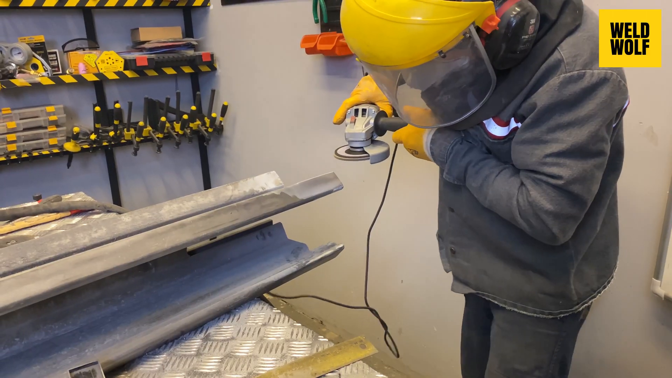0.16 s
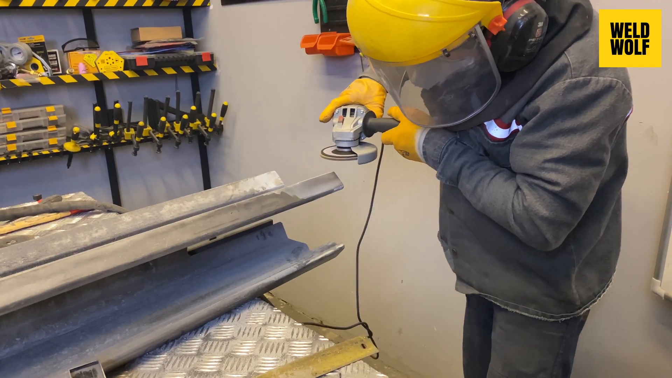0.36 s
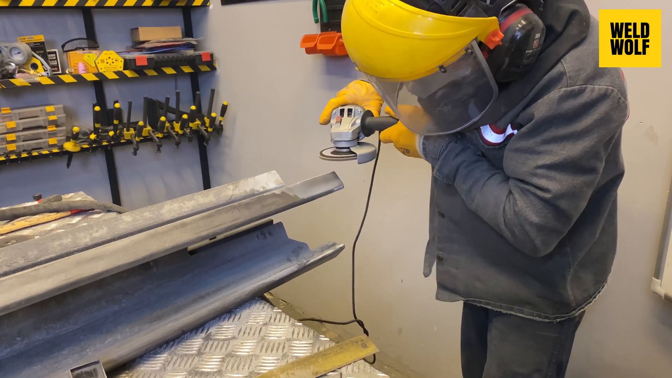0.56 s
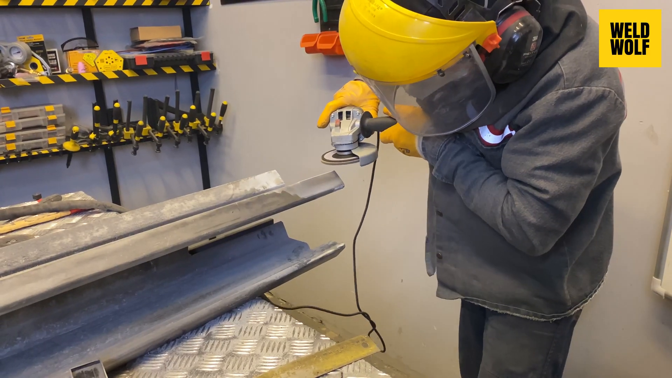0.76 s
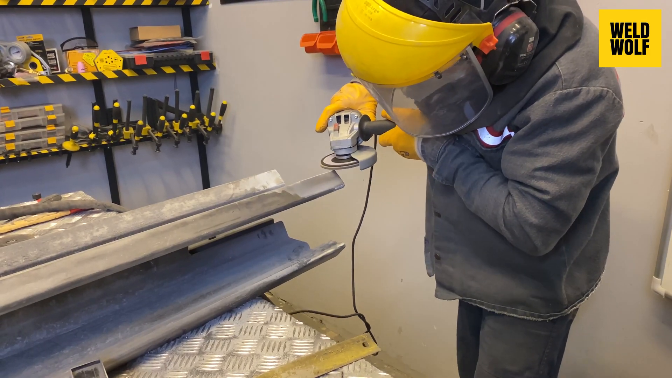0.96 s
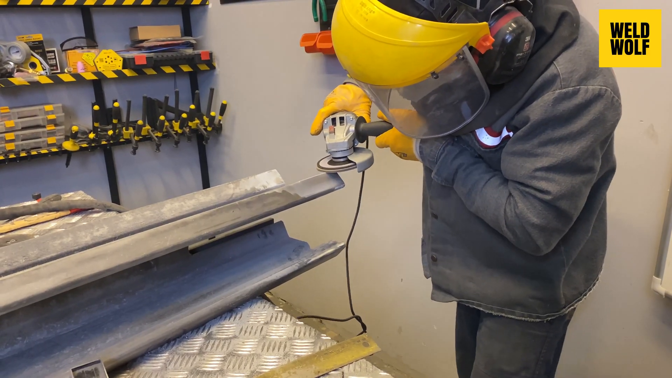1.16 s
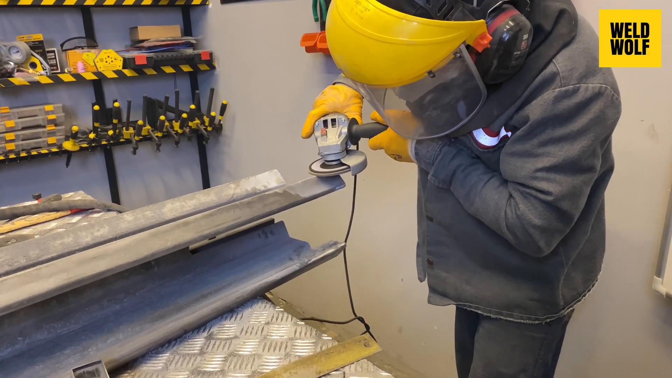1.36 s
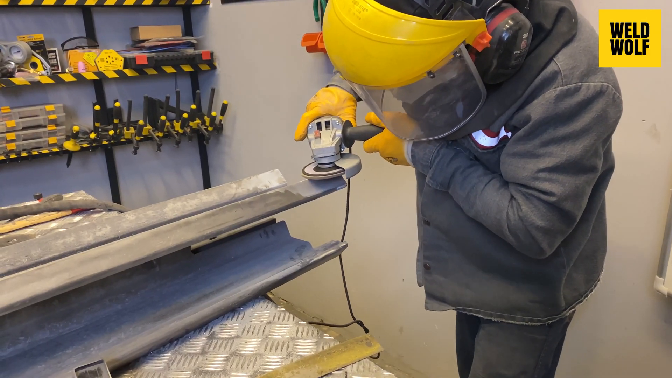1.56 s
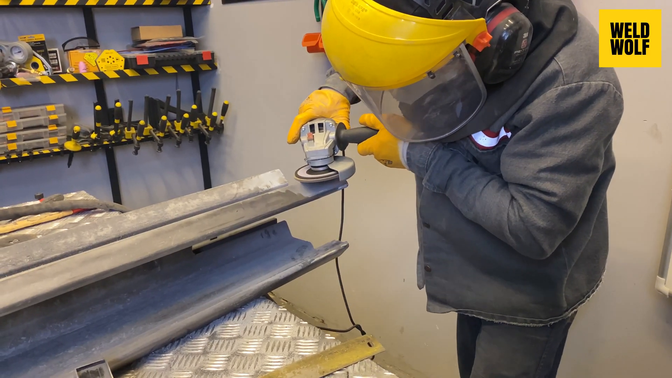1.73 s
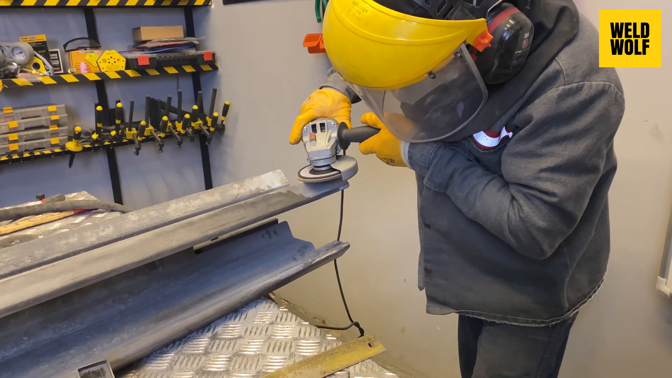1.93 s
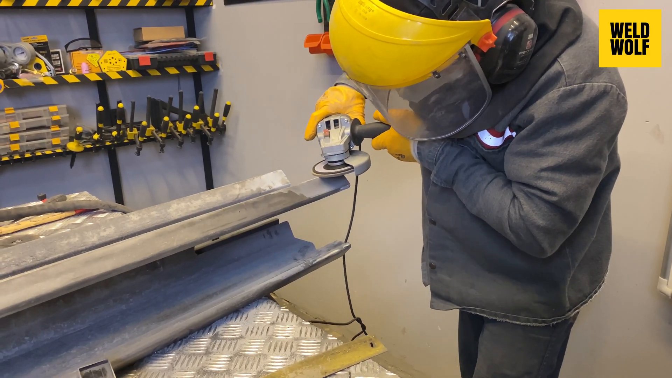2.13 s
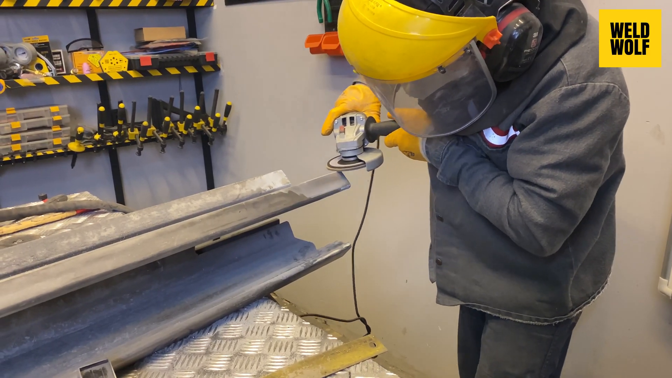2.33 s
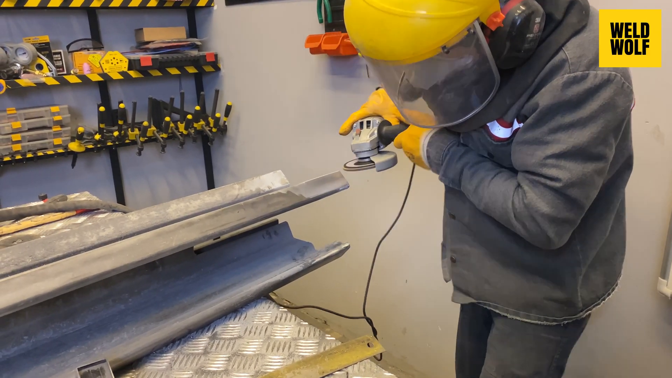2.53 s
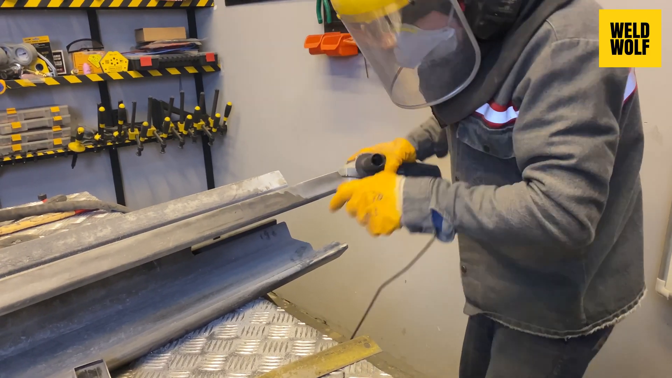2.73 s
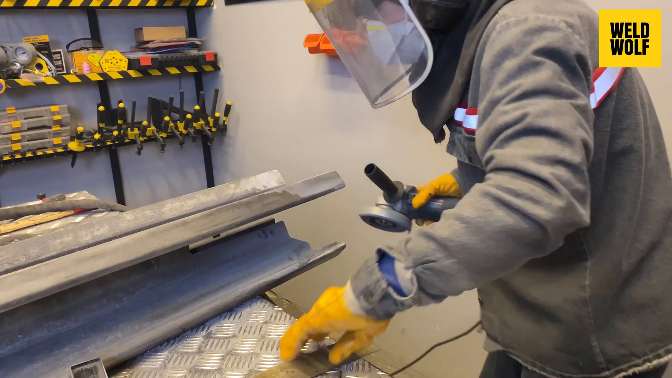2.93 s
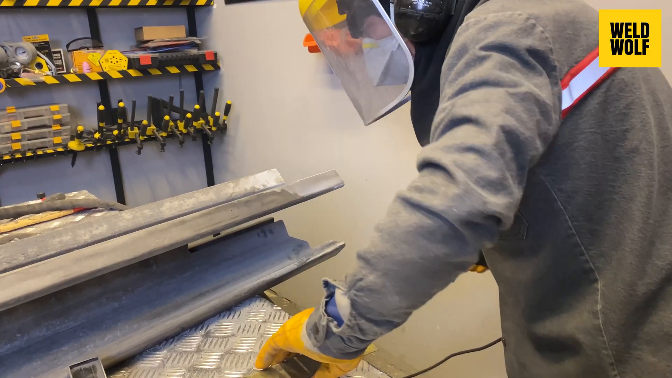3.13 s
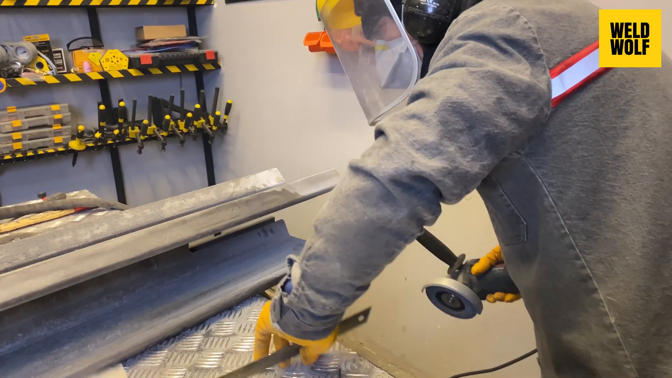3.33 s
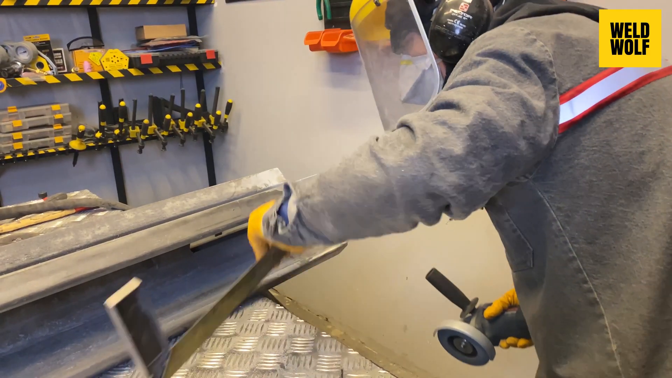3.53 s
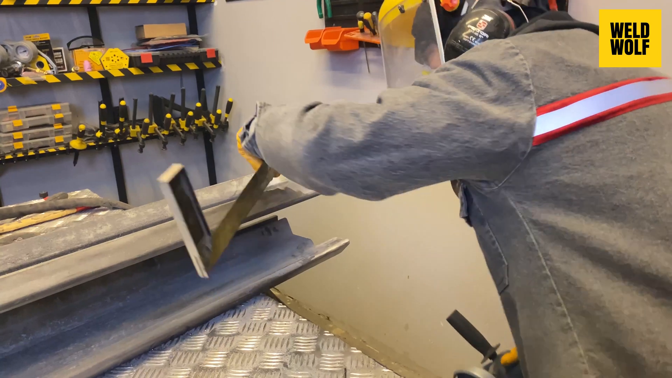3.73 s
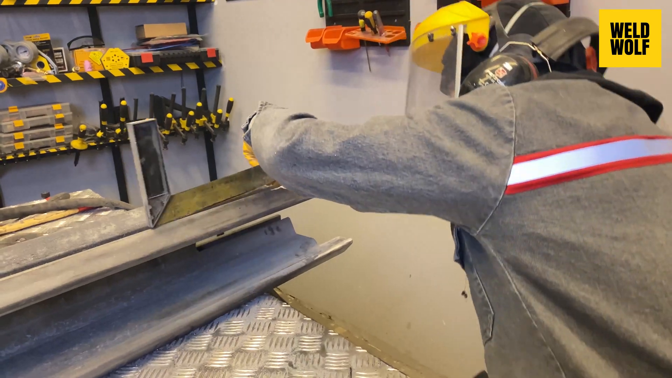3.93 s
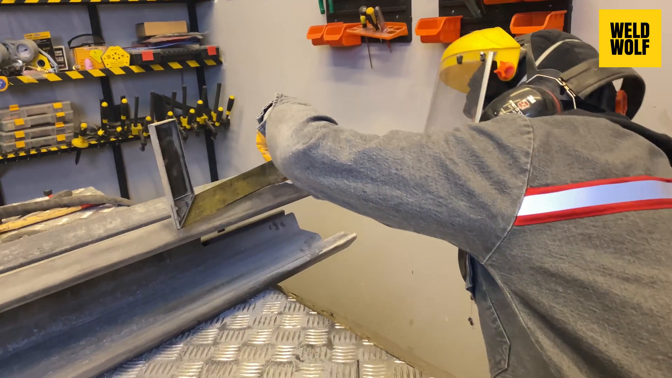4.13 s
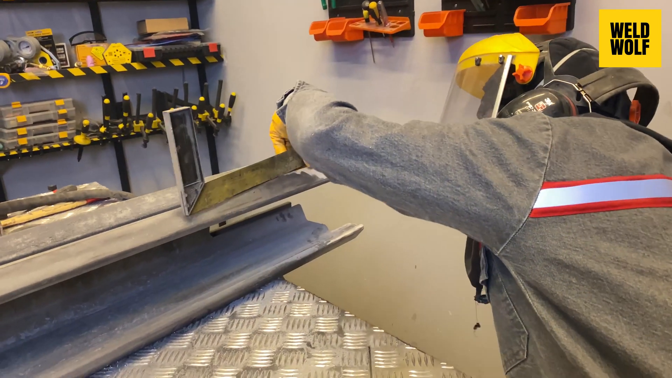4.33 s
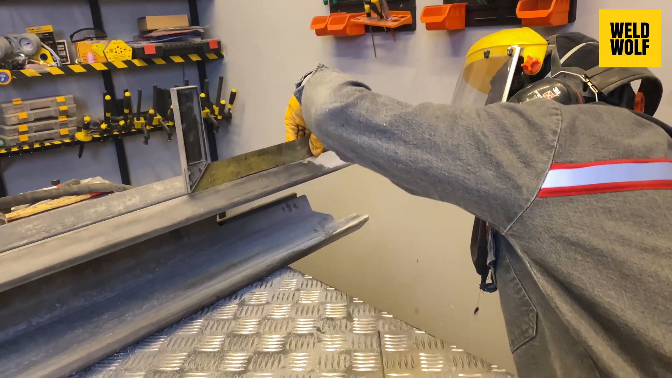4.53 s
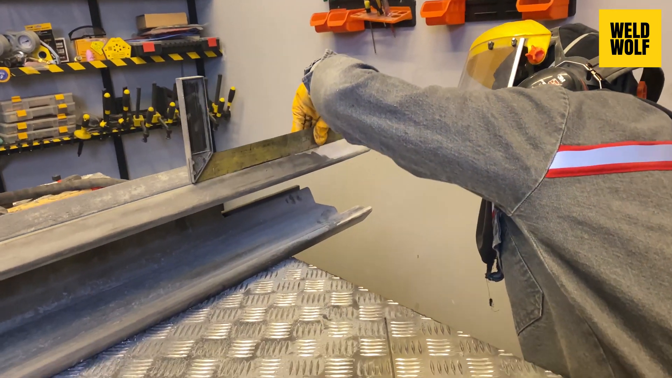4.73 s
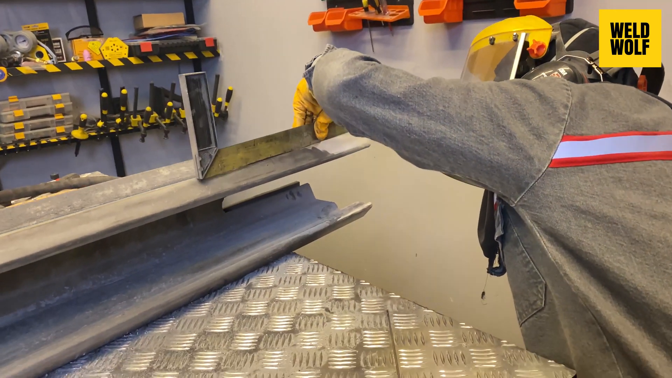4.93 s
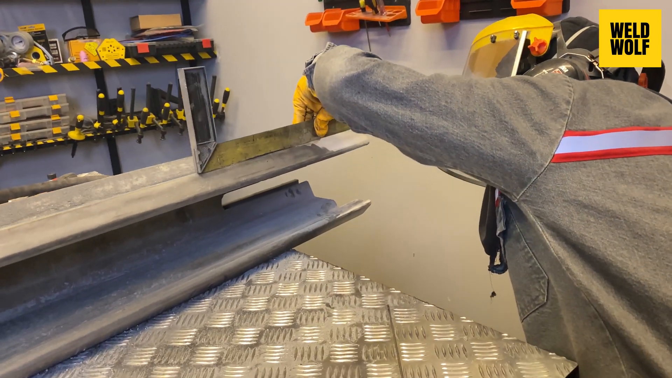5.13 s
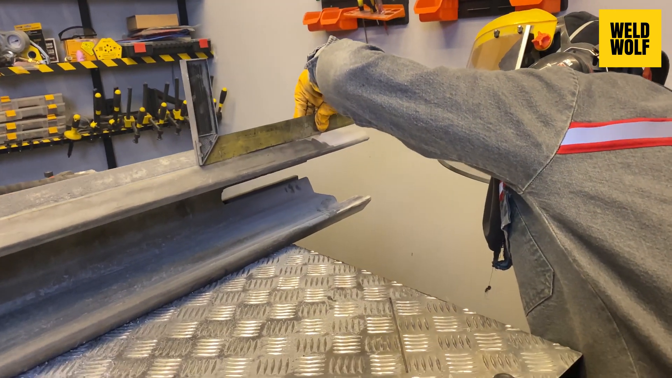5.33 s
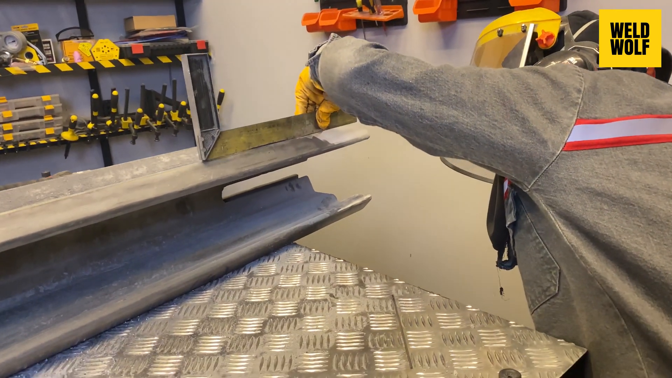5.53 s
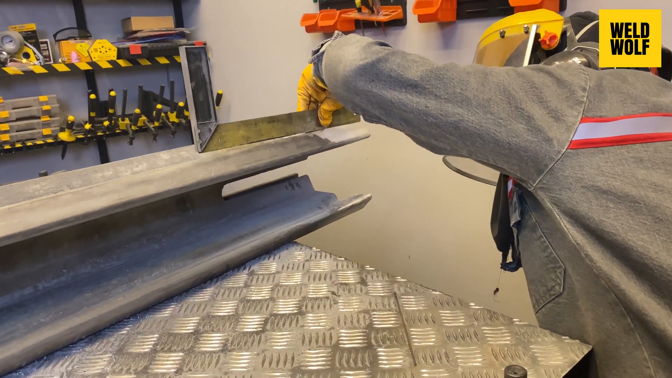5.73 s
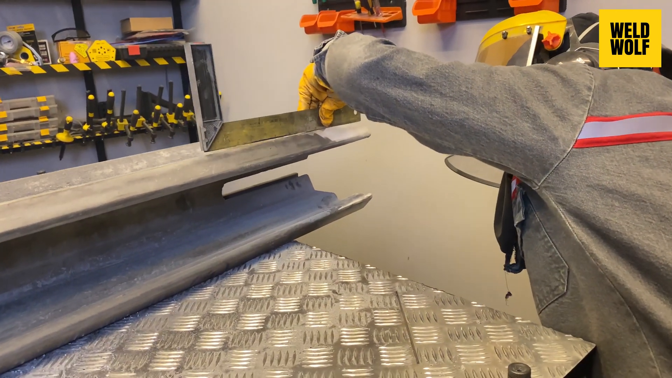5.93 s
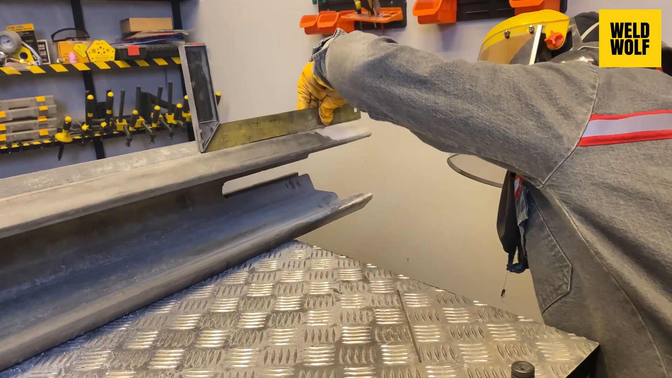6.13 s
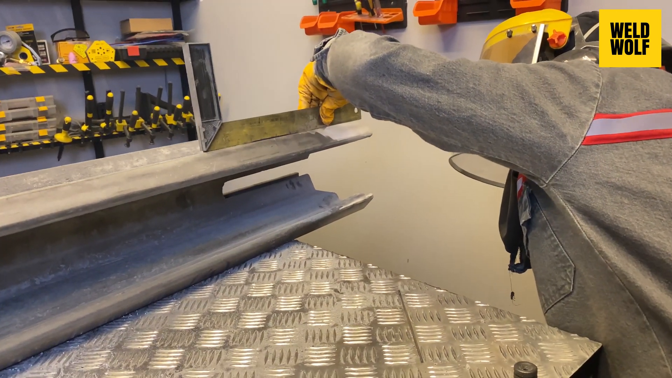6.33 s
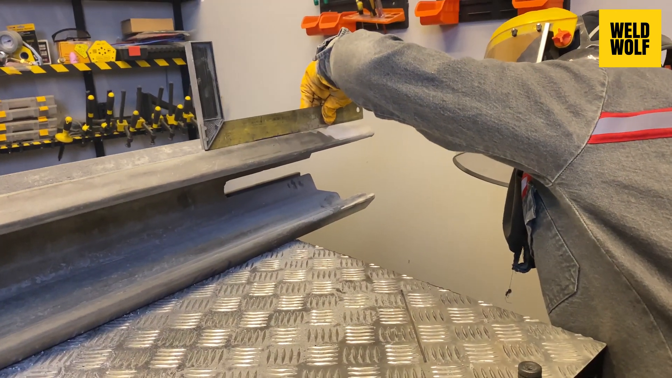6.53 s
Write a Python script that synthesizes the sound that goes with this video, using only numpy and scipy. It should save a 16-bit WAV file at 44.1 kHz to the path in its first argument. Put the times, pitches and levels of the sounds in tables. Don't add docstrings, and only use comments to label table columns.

```python
import sys
import numpy as np
from scipy import signal
from scipy.fft import rfft, irfft, next_fast_len
from scipy.io import wavfile
from scipy.ndimage import uniform_filter1d

SR = 44100
rng = np.random.default_rng(int(sys.argv[2]) if len(sys.argv) > 2 else 0)


def generate_wav(signal):
    frames = np.transpose(np.atleast_2d(signal))
    scaled = np.clip(frames, -1, 1) * 32767
    pcm = np.round(scaled).astype(np.int16)
    wavfile.write(sys.argv[1], SR, pcm)


def volts_from_db(level):
    exponent = np.asarray(level, float) / 20
    return 10 ** exponent


N = 294147
M = next_fast_len(N + SR, True)
T = np.arange(N) / SR
HZ = np.arange(M // 2 + 1) * SR / M + 1e-3

DISC_PER_ROTOR = 10 / 39
RATED_HZ = 500
START_HZ, RUN_UP_HZ_PER_S, FIRST_OFF_S = 553, 130, .09
SOFT_START_S, SOFT_RISE_S, SECOND_OFF_S = .93, .105, 2.39
DRAG_EQUAL_HZ, DRAG_PER_S = 391, .243
# (time [s], speed [Hz])
LOADED_SPEED = [
    (1.25, 507),
    (1.43, 506),
    (1.75, 508),
    (1.89, 512),
    (1.98, 504),
    (2.15, 500),
    (2.31, 505),
    (2.39, 526),
]
# (time [s], level [dB])
FACING = [(0, -0.5), (.3, -3), (.72, -0.5), (1.24, 1), (1.69, 1.5), (2.38, -1), (2.73, 0.5), (3, 0.5),
          (3.5, 2.5), (4.03, 1.5), (4.25, 0.5), (4.85, 0), (5.9, 2)]
# (frequency [Hz], density [dB per Hz])
CASE_COLOUR = [(150, -23), (300, -19), (700, -9), (1200, -13), (2300, -8), (3000, -12), (4000, -9.5),
               (6300, -22.5), (8600, -26), (11800, -31.5), (14500, -37.5), (15800, -59)]
# (frequency [Hz], width [Hz], lift [dB])
CASE_MODES = [(721, 64, 4), (1143, 200, 7.5), (1990, 63, 4.5), (2190, 320, 6.5), (2474, 97, 8),
              (3560, 74, 7.5), (3730, 83, 8), (4390, 72, 10.5), (6170, 1000, 14)]
CASE_DB, CASE_IDLE_HZ = -49, 49
TREBLE_HZ, TREBLE_DB_PER_DECADE = 5050, 2.5
STALL_S, STALL_DB_PER_S, STALL_DEPTH_DB = 6.156, 70, 40
# (frequency [Hz], density [dB per Hz])
FAN_COLOUR = [(150, -28), (320, -27.5), (500, -15), (900, -16), (2080, -1.5), (2700, -7.5), (3200, -2.5),
              (5500, -3.5), (7400, -6), (9000, -14), (11000, -15), (13300, -15), (15800, -17)]
FAN_DB, FAN_DB_PER_DECADE = -44, 34
SHADOW_S, SHADOW_DB = 2.64, -10.5

# (time [s], pressure [dB], lean onto the flaps [dB], beam contact [dB])
GRIND = [(.985, -60, 4, 5), (1.0, -53, 3, 3), (1.008, -45, 1, -0.5), (1.06, -46, 0.5, -1.5),
         (1.128, -40, -2.5, -4), (1.31, -37.5, -5, -5.5), (1.68, -42, -1.5, -2.5), (1.74, -39, -7.5, -6.5),
         (1.9, -39.5, -5.5, -3.5), (2.25, -41.5, -1, -2), (2.33, -45.5, -2.5, 2.5),
         (2.39, -61.5, 0.5, -1.5)]
# (frequency [Hz], density [dB per Hz])
GRIT_COLOUR = [(5000, -34), (8000, -10.5), (9300, -3.5), (10200, -1), (11300, -1), (12800, -5.5),
               (13300, -12), (14300, -3.5), (15100, -5.5), (15800, -1.5)]
# (frequency [Hz], density [dB per Hz])
FLAP_COLOUR = [(4500, -27), (5600, -8.5), (6800, 0.5), (7700, -2), (8400, -15), (9200, -14)]
# (frequency [Hz], density [dB per Hz])
BEAM_COLOUR = [(59, -48), (100, -28), (124, -15), (177, -15.5), (433, -8.5), (504, -4), (557, -13.5),
               (640, -4), (821, -11.5), (1560, -4), (2670, -16), (3490, 4.5), (5600, 6.5), (7280, -11),
               (12300, -120)]
# (times a disc turn [1], start [s], length [s], level [dB])
THUMPS = [
    (1, 1.25, .15, -67),
    (1, 2.05, .1, -70),
    (2, 1.5, .4, -73),
    (3, 1.3, .2, -72),
    (3, 2.05, .25, -69),
    (5, 1.25, .2, -67),
    (5, 2.08, .1, -65),
]
WEB_HZ = 1156
# (time [s], length [s], level [dB])
WEB = [
    (1.3, 0.23, -58.5),
    (1.8, 0.41, -56),
]

HUM_DB, HUM_DB_PER_DECADE2 = -76, 300
# (time [s], length [s], level [dB])
HUM_SWELLS = [(.05, 0.034, -66), (.22, 0.15, -59.5), (.47, .05, -60.5), (.65, 0.055, -61),
              (.88, 0.032, -56), (.98, 0.068, -62), (1.13, 0.044, -58.5), (1.24, 0.15, -59.5),
              (1.5, 0.078, -64), (1.68, 0.3, -61), (2.1, 0.18, -62), (2.36, .19, -61), (2.62, 0.033, -54.5),
              (2.74, 0.23, -66), (3.05, 0.18, -70.5)]
MESH_DB, MESH_BEST_HZ, MESH_DB_PER_OCTAVE2 = -75.5, 1300, 7
# (time [s], length [s], level [dB])
BITES = [
    (1.14, .01, -45),
    (1.21, .05, -39),
    (1.335, .025, -42),
    (1.42, .05, -38.5),
    (1.77, .15, -41),
    (2.0, .02, -46),
    (2.1, .07, -39),
    (2.25, .02, -52),
]
BLADES_DB, BLADES_DB_PER_DECADE, BLADES_LOAD_DB, BLADES_RUN_UP_DB = -56, 60, 1, 3
# (frequency [Hz], width [Hz], lift [dB])
VENT_LIFT = [(10900, 800, 4), (11900, 400, -4), (8600, 500, -5), (7200, 250, 11), (6400, 280, 15),
             (5750, 350, 11), (5000, 500, 13), (12900, 400, 4)]

SQUEAL_HZ, SQUEAL_RISE_HZ_PER_S, SQUEAL_HIGH_HZ = 4360, 30, 4490
# (time [s], length [s], level [dB])
SQUEAL = [
    (.605, 0.015, -45.5),
    (.685, 0.03, -41),
    (.74, .02, -46),
    (.8, 0.03, -45),
    (.85, 0.012, -39),
    (.915, .01, -43),
    (.95, 0.045, -40.5),
    (1.06, 0.015, -47),
]
# (time [s], length [s], level [dB])
SQUEAL_HIGH = [
    (.91, .025, -43),
    (.97, .06, -45),
]
SLACK_S, SLACK_DB, SLACK_FIRST_DB, SLACK_SETTLE_S = 3.49, -14, 9.5, 1
# (time [s], frequency [Hz])
SLACK_PITCH = [
    (3.45, 2406),
    (4.4, 2250),
    (4.8, 2383),
    (6.3, 2306),
]
# (time [s], frequency [Hz])
COVER_PITCH = [(3.5, 3620), (4.2, 3560), (4.7, 3490), (5.1, 3600), (5.5, 3480), (6.3, 3560)]
COVER_DB = -18
COVER_QUIET_S, COVER_QUIET_DB = 5.27, -10.5
# (frequency [Hz], start [s], level against the rattle [dB])
HOUSING = [(2224, 3.4, -14.5), (2430, 4.75, -15), (3970, 5, -16), (4280, 3.7, -18.5)]
# (frequency [Hz], time
# [s], length [s], level [dB])
SHIELD = [(1121, 0.071, .62, -61), (1120, 2.75, .25, -64), (2065, 2.27, 0.21, -52), (3200, 2.33, 0.12, -54),
          (1542, 1.93, 0.4, -54.5), (5170, 1.385, .05, -44), (4100, .75, 0.068, -48.5)]
HANDLE_HZ, HANDLE_S, HANDLE_DB = 710, 4.2, -15
GUARD_HZ = 5580
# (time [s], length [s], level [dB])
GUARD = [
    (1.45, .05, -46),
    (1.55, .09, -43),
    (1.97, .05, -47),
]
SQUEAK_HZ = 6570
# (time [s], length [s], level [dB])
SQUEAK = [
    (6.31, .02, -86),
    (6.37, 0.014, -85),
    (6.41, 0.019, -83),
    (6.49, .015, -93),
    (6.54, .03, -99),
]
# (time [s], frequency [Hz], level [dB], t60 [s])
RINGS = [(0, 5570, -39, .5), (0, 4360, -43, .35), (.843, 6030, -46, .12), (3.347, 4970, -43, .06),
         (3.347, 4270, -48, .05), (3.836, 6900, -41, .02), (3.836, 2720, -39, .035),
         (3.8535, 5490, -41, .045), (4.869, 1880, -49, .06), (4.869, 2720, -46, .025),
         (4.788, 1880, -43, .05), (4.87, 3820, -53, .09), (6.028, 1390, -68, .35), (6.028, 1640, -71, .25),
         (6.05, 1190, -72, .4)]

# (time [s], boom [dB], thud [dB], clink [dB], tick [dB])
KNOCKS = [(3.065, -65, -53, -58, -60), (3.169, -65, -49.5, -45, -62.5), (3.264, -54.5, -49.5, -46.5, -48.5),
          (3.347, -40, -36, -39, -43.5), (3.364, -54, -51, -42, -53.5), (3.385, -42, -52, -57, -58),
          (3.404, -47, -43.5, -54, -58.5), (3.836, -84, -81, -40, -39), (3.854, -80, -81, -49, -49.5),
          (3.919, -65.5, -52.5, -64, -64), (4.057, -78, -73, -50, -55.5), (4.1743, -77.5, -65, -41.5, -47),
          (4.191, -76, -55.5, -51, -54.5), (4.787, -67, -53, -50.5, -62.5), (4.81, -68, -58, -50, -65.5),
          (4.829, -75.5, -73, -55, -68.5), (4.869, -71.5, -65, -50, -60), (4.886, -68, -62, -52, -66.5),
          (5.531, -84, -78, -58, -63.5), (5.573, -65.5, -59.5, -76, -68), (5.696, -61, -57, -82, -70.5),
          (6.028, -78, -57, -61, -68.5), (6.044, -69, -55.5, -61, -73)]
# (frequency [Hz], level [dB], t60 [s])
PLATE_MODES = [(131, -8, 0.11), (190, -5, .09), (245, -4, .07), (293, 1, 0.24), (338, -1, 0.15)]
# (frequency [Hz], level [dB], t60 [s])
FLANGE_MODES = [(460, -1.5, 0.14), (546, 1, 0.1), (592, -1.5, 0.16), (644, 6, 0.057), (736, -1, 0.091),
                (995, 5.5, 0.027)]
# (frequency [Hz], level [dB], t60 [s])
SQUARE_MODES = [(1138, -5.5, 0.04), (1468, -8, 0.035), (1887, 0, 0.025), (2040, -3, 0.021),
                (2315, -6, 0.05), (2720, 6, 0.022), (3090, -7, 0.03)]
# (frequency [Hz], level [dB], t60 [s])
EDGE_MODES = [(3880, -3.5, 0.095), (5100, 2, 0.013), (5400, -15.5, 0.054), (7020, 3, 0.017),
              (11270, -10.5, 0.016)]

SHOP_DB, HUSH_S, HUSH_DB = -74, 6.52, -6
# (frequency [Hz], density [dB per Hz])
RUMBLE_COLOUR = [(12, -55), (20, -25), (63, -2), (103, -2), (139, 0), (197, -10), (232, -5.5), (359, -10.5),
                 (806, -11.5), (1440, -21.5), (5000, -42.5), (6500, -71.5), (11000, -120)]
# (time [s], length [s], level [dB])
STEPS = [(.1, 0.41, -72), (1.3, 0.24, -65.5), (1.72, 0.034, -64), (1.85, 0.22, -68), (2.3, 0.054, -65.5),
         (3.06, .02, -62), (3.17, 0.055, -54.5), (3.38, 0.087, -58), (5.62, .2, -73), (5.98, 0.068, -72),
         (6.43, 0.034, -77.5)]
DRONE_HZ, DRONE_DB = 63.3, -80
# (frequency [Hz], room against direct [dB])
ROOM = [(60, -8), (300, 8), (1000, 5.5), (3000, 0.5), (6000, -3.5), (8300, 11), (10000, -18.5),
        (15000, -15.5)]
ROOM_T60_S = .27
# (frequency [Hz], lag of the left port [cycles])
PORT_TURNS = [(0, 0), (1000, -.1), (4100, -.1), (5400, -.3), (7250, 0), (9250, .5), (9900, .8),
              (16000, 2.07)]
HIDDEN_S, HIDDEN_WET_DB, HIDDEN_LEFT_DB = 3.1, 5, -0.5
TOP_HZ = 15830


def motor(rotor, hz):
    lumps = volts_from_db(1.1 * walk(70) + 1.4 * np.cos(2 * np.pi * rotor * DISC_PER_ROTOR))
    chatter = rng.standard_normal(N) * volts_from_db(1.65 * rng.exponential(size=N)) * lumps
    case = colour(chatter, shape(CASE_COLOUR), lo_hz=1703, hi_hz=2830) * volts_from_db(-5.5)
    spec = rfft(case, M)
    for f, width, lift_db in CASE_MODES:
        resonance = (volts_from_db(lift_db) - 1) / (1 + (2 * (HZ - f) / width) ** 2)
        case = case + irfft(spec * resonance, M)[:N] * volts_from_db(1.0 * walk(6.3) - 1.2)
    dull = signal.sosfilt(signal.butter(2, TREBLE_HZ, fs=SR, output="sos"), case)
    decades = np.log10(hz / RATED_HZ)
    case = dull + (case - dull) * volts_from_db(TREBLE_DB_PER_DECADE * decades)
    gusts = rng.standard_normal(N) * volts_from_db(0.32 * walk(12))
    air = colour(gusts, shape(FAN_COLOUR), lo_hz=4586, hi_hz=6285)
    fan_db = FAN_DB + FAN_DB_PER_DECADE * decades + over_time(FACING) + SHADOW_DB * step(SHADOW_S, 0.12)
    return case * volts_from_db(rattle_db(hz) - 2.5) + air * volts_from_db(fan_db + 2.0)


def rattle_db(hz):
    speed_db = 20 * np.log10((hz + CASE_IDLE_HZ) / (RATED_HZ + CASE_IDLE_HZ))
    stall_db = np.clip(STALL_DB_PER_S * (T - STALL_S), 0, STALL_DEPTH_DB)
    return CASE_DB + speed_db - stall_db + over_time(FACING)


def speed():
    let_go_hz = START_HZ + RUN_UP_HZ_PER_S * FIRST_OFF_S
    first = np.minimum(START_HZ + RUN_UP_HZ_PER_S * T, coast(let_go_hz, FIRST_OFF_S))
    powered = first + (over_time(LOADED_SPEED) - first) * step(SOFT_START_S, SOFT_RISE_S)
    run_down = coast(LOADED_SPEED[-1][1], SECOND_OFF_S)
    return uniform_filter1d(np.where(T < SECOND_OFF_S, powered, run_down), SR // 20)


def coast(hz, off_s):
    angle = np.arctan(hz / DRAG_EQUAL_HZ) - DRAG_PER_S * np.maximum(T - off_s, 0)
    return DRAG_EQUAL_HZ * np.tan(np.maximum(angle, .01))


def grind(disc):
    turns = np.clip(disc - disc[int(.9 * SR)], 0, 890)
    touching = (T > GRIND[0][0]) & (T < GRIND[-1][0])
    press_db = np.where(touching, over_time(GRIND), -150)
    beat = volts_from_db(1.4 * np.cos(2 * np.pi * disc) + 2.1 * np.cos(6 * np.pi * disc) + 0.44 * walk(28))
    grit = colour(each_turn(turns, .8, 1.3) * beat, shape(GRIT_COLOUR), lo_hz=9700, hi_hz=12400)
    flaps = colour(each_turn(turns, 0.6, 2.4) * beat, shape(FLAP_COLOUR), lo_hz=5390, hi_hz=8350)
    beam = colour(each_turn(turns, 0.6, 1.9), shape(BEAM_COLOUR), lo_hz=2510, hi_hz=5060)
    flaps = flaps * volts_from_db(over_time(GRIND, column=2) + 3.5)
    beam = beam * volts_from_db(over_time(GRIND, column=3) - 1.0)
    return volts_from_db(press_db + 2.0) * (grit + flaps + beam)


def each_turn(turns, memory, scatter_db, size=320):
    fresh = rng.standard_normal((900, size)) * volts_from_db(scatter_db * rng.exponential(size=(900, size)))
    wheel = signal.lfilter([1], [1, -np.clip(memory, 0, .97)], fresh, axis=0).ravel()
    fine = signal.resample_poly(wheel, 4, 1)
    return np.interp(turns * size * 4, np.arange(len(fine)), fine)


def unbalance_hum(rotor, hz):
    resonance = volts_from_db(HUM_DB - HUM_DB_PER_DECADE2 * np.log10(hz / RATED_HZ) ** 2)
    gain = resonance + swells(HUM_SWELLS, rise_db_s=222, fall_db_s=220)
    return order_tone(rotor, 1, gain, wobble=.25, runout=0, waver_db=1.2)


def gear_mesh(rotor, hz):
    unloaded = volts_from_db(MESH_DB - MESH_DB_PER_OCTAVE2 * np.log2(10 * hz / MESH_BEST_HZ) ** 2)
    gain = unloaded + volts_from_db(-.3) * swells(BITES, rise_db_s=550, fall_db_s=550)
    return order_tone(rotor, 10, gain, wobble=.45, runout=.4, waver_db=1.3)


def fan_blades(rotor, hz):
    vents_db = sum(db * np.exp(-((23 * hz - f) / width) ** 2) for f, width, db in VENT_LIFT)
    touching = step(GRIND[0][0] + .05, .02) - step(GRIND[-1][0], .02)
    level_db = BLADES_DB + BLADES_DB_PER_DECADE * np.log10(hz / RATED_HZ) + vents_db
    level_db = level_db + BLADES_LOAD_DB * touching + BLADES_RUN_UP_DB * (1 - step(FIRST_OFF_S, .02))
    level_db = level_db - 3 * step(SECOND_OFF_S + .15, .05)
    blades = order_tone(rotor, 23, volts_from_db(level_db), wobble=1.2, runout=0, waver_db=1.8)
    octave_gain = np.exp(-((hz * 46 - 15300) / 700) ** 2) * volts_from_db(-59)
    return blades + octave_gain * np.sin(2 * np.pi * 46 * rotor)


def order_tone(rotor, order, gain, wobble, runout, waver_db):
    phase = 2 * np.pi * order * rotor + wobble * walk(40)
    phase = phase + runout * np.sin(2 * np.pi * rotor * DISC_PER_ROTOR)
    return np.sqrt(2) * np.sin(phase) * gain * volts_from_db(waver_db * walk(27))


def disc_thumps(disc):
    out = np.zeros(N)
    for per_turn, *swell in THUMPS:
        gain = swells([swell], rise_db_s=67.5, fall_db_s=63.0)
        out += gain * np.sqrt(2) * np.sin(2 * np.pi * round(per_turn) * disc)
    return out


def loose_flange(disc):
    pitch = SQUEAL_HZ + SQUEAL_RISE_HZ_PER_S * (T - SOFT_START_S)
    low_gain = swells(SQUEAL, rise_db_s=300, fall_db_s=200) * volts_from_db(.6)
    high_gain = swells(SQUEAL_HIGH, rise_db_s=300, fall_db_s=300)
    low = singing(pitch, low_gain, disc, flutter=165, beat_db=3.0)
    return low + singing(SQUEAL_HIGH_HZ, high_gain, disc, flutter=120, beat_db=3.0)


def slack_gears(hz, disc):
    first_db = SLACK_FIRST_DB * (1 - step(SLACK_S + SLACK_SETTLE_S, .1))
    gain = volts_from_db(rattle_db(hz) + walk(9) + SLACK_DB + first_db) * step(SLACK_S, .006)
    return singing(over_time(SLACK_PITCH), gain, disc, flutter=210, beat_db=3.0)


def housing(hz, disc):
    rattle = rattle_db(hz)
    cover_db = rattle + COVER_DB + COVER_QUIET_DB * step(COVER_QUIET_S, .05) + 3 * walk(6)
    out = singing(over_time(COVER_PITCH), volts_from_db(cover_db) * step(SLACK_S, .1), disc, flutter=90, beat_db=2)
    for f, s, db in HOUSING:
        out = out + singing(f, volts_from_db(rattle + db + 3 * walk(6)) * step(s, .1), disc, flutter=70, beat_db=2)
    handle_gain = volts_from_db(rattle + HANDLE_DB) * step(HANDLE_S, .1)
    return out + singing(HANDLE_HZ, handle_gain, disc, flutter=50, beat_db=2)


def plates(disc):
    web = singing(WEB_HZ, swells(WEB, rise_db_s=100, fall_db_s=150), disc, flutter=40, beat_db=0)
    guard = singing(GUARD_HZ, swells(GUARD, rise_db_s=300, fall_db_s=300), disc, flutter=30, beat_db=0)
    out = web + guard
    for f, *swell in SHIELD:
        gain = swells([swell], rise_db_s=300, fall_db_s=300)
        out = out + singing(f, gain, disc, flutter=45, beat_db=0)
    return out


def brushes(disc):
    gain = swells(SQUEAK, rise_db_s=250, fall_db_s=220)
    return singing(SQUEAK_HZ, gain, disc, flutter=900, beat_db=0)


def singing(hz, gain, disc, flutter, beat_db):
    phase = 2 * np.pi * np.cumsum(hz + 0 * T) / SR
    mode = walk(flutter) * np.cos(phase) + walk(flutter) * np.sin(phase)
    return mode * gain * volts_from_db(beat_db * np.cos(2 * np.pi * disc))


def ringing_out():
    out = np.zeros(N)
    for s, f, db, t60 in RINGS:
        start = int(s * SR)
        t = T[:min(SR, N - start)]
        out[start:start + len(t)] += volts_from_db(db - 60 * t / t60) * np.sin(2 * np.pi * f * t)
    return out


def knocks():
    out, t = np.zeros(N + SR), T[:SR // 4]
    bodies = (PLATE_MODES, FLANGE_MODES, SQUARE_MODES, EDGE_MODES)
    for s, *levels in KNOCKS:
        blow = 0
        for modes, db, trim_db in zip(bodies, levels, (-1.5, -1.5, 3, 1.5)):
            scatter = rng.standard_normal((len(modes), 2))
            for (f, mode_db, t60), (a, b) in zip(modes, scatter):
                decay = volts_from_db(db + trim_db + mode_db + 2.0 * a - 60 * t / t60)
                blow = blow + decay * np.sin(2 * np.pi * f * (1 + 0.011 * b) * t)
        grit = uniform_filter1d(np.diff(rng.standard_normal(len(t) + 4), prepend=0)[4:], size=3)
        crack = volts_from_db(levels[3] + 11.5) * grit * np.exp(-t / .002)
        out[int(s * SR):int(s * SR) + len(t)] += blow * (1 - np.exp(-t / 0.0011)) + crack
    return signal.sosfilt(signal.butter(2, 100, "high", fs=SR, output="sos"), out[:N])


def shop():
    rumble = shape(RUMBLE_COLOUR)
    mid, side = (colour(rng.standard_normal(N), rumble, lo_hz=40.7, hi_hz=180.5) for _ in range(2))
    building = volts_from_db(SHOP_DB + HUSH_DB * step(HUSH_S, 0.04))
    gain = np.hypot(building, swells(STEPS, rise_db_s=112.5, fall_db_s=82.5))
    drone_gain = volts_from_db(DRONE_DB + HUSH_DB * step(6.5, 0.017))
    drone = singing(DRONE_HZ, drone_gain, 0, flutter=24, beat_db=-1.0)
    return gain * volts_from_db(-6.0) * np.array([mid + 0.4 * side, mid - 0.41 * side]) + drone


def ports(x, wet_db):
    tail = rng.standard_normal((2, SR)) * volts_from_db(-60 * T[:SR] / ROOM_T60_S) * (T[:SR] > .004)
    mid, side = rfft(tail / np.sqrt(np.sum(tail ** 2, axis=1, keepdims=True)), M)
    wide, wet = np.clip(HZ / 390, .3, 1), shape(ROOM) * volts_from_db(wet_db)
    room = wet * np.array([mid + wide * side, mid - wide * side]) / np.sqrt(1 + wide ** 2)
    half_lag = 1j * np.pi * np.interp(HZ, *np.transpose(PORT_TURNS))
    direct = np.exp(np.outer([-1, 1], half_lag))
    return irfft(rfft(x, M) * (direct + room) / np.sqrt(1 + wet ** 2), M)[:, :N]


def shape(points):
    hz, db = np.transpose(points)
    return volts_from_db(np.interp(np.log(HZ), np.log(hz), db, left=-90, right=-90))


def colour(x, gain, lo_hz, hi_hz):
    spec = rfft(x, M) * gain
    band = np.sum(np.abs(spec[(HZ > lo_hz) & (HZ < hi_hz)]) ** 2)
    return irfft(spec, M)[:N] * np.sqrt(N * M / (2 * band))


def walk(rate):
    k = int(SR / rate)
    held = np.repeat(rng.standard_normal(N // k + 1), k)
    return 1.44 * uniform_filter1d(uniform_filter1d(held, k), k)[:N]


def over_time(table, column=1):
    rows = np.array(table)
    return np.interp(T, rows[:, 0], rows[:, column])


def swells(rows, rise_db_s, fall_db_s):
    t = T[::32]
    power = 0
    for s, hold, db in rows:
        before, after = np.maximum(s - t, 0), np.maximum(t - s - hold, 0)
        power = power + volts_from_db(db - rise_db_s * before - fall_db_s * after) ** 2
    return np.interp(T, t, np.sqrt(power))


def step(s, width_s):
    return .5 + .5 * np.tanh((T - s) / width_s / 2)


def scene():
    hz = speed()
    rotor = np.cumsum(hz) / SR
    disc = rotor * DISC_PER_ROTOR
    tool = motor(rotor, hz) + grind(disc)
    near = unbalance_hum(rotor, hz) + gear_mesh(rotor, hz) + fan_blades(rotor, hz) + disc_thumps(disc)
    near = near + loose_flange(disc) + slack_gears(hz, disc) + housing(hz, disc)
    near = near + plates(disc) + brushes(disc) + ringing_out() + knocks()
    hidden = step(HIDDEN_S, .15)
    in_front = ports(tool * np.sqrt(1 - hidden), wet_db=-1.0)
    balance = volts_from_db(np.array([[.5], [-.5]]) * HIDDEN_LEFT_DB)
    behind = ports(tool * np.sqrt(hidden), wet_db=HIDDEN_WET_DB) * balance
    return in_front + behind + ports(near, wet_db=-9) + shop()


def top_cut(x):
    return signal.sosfilt(signal.butter(12, 17090, fs=SR, output="sos"), x)


def record(dry):
    mix = irfft(rfft(dry, M) * (HZ < TOP_HZ), M)[:, :N]
    return top_cut(mix)


dry = scene()
out = record(dry)
generate_wav(out)
```